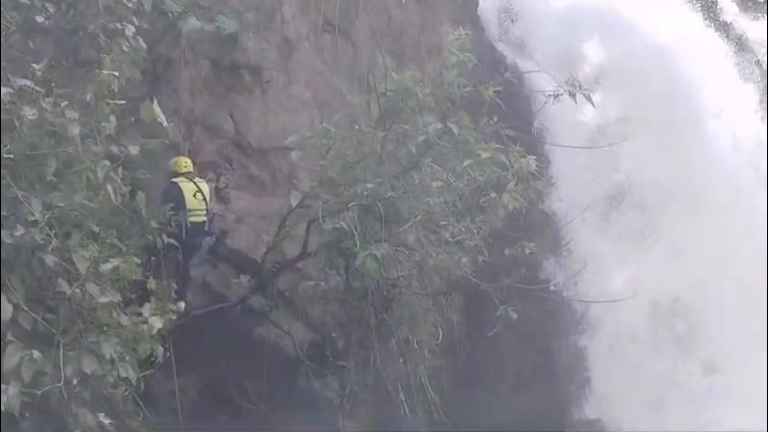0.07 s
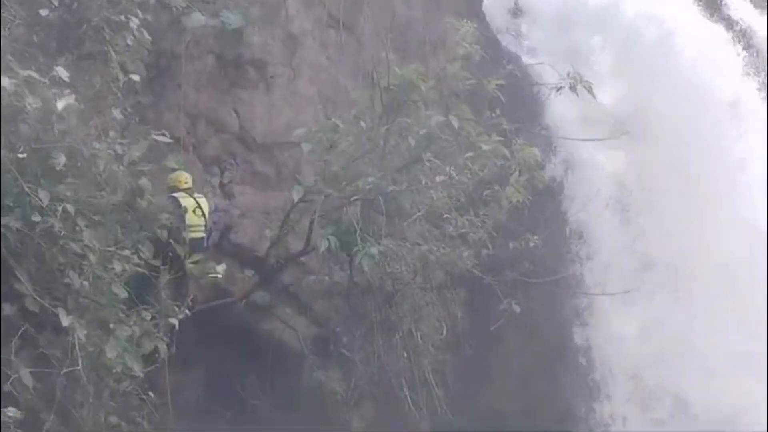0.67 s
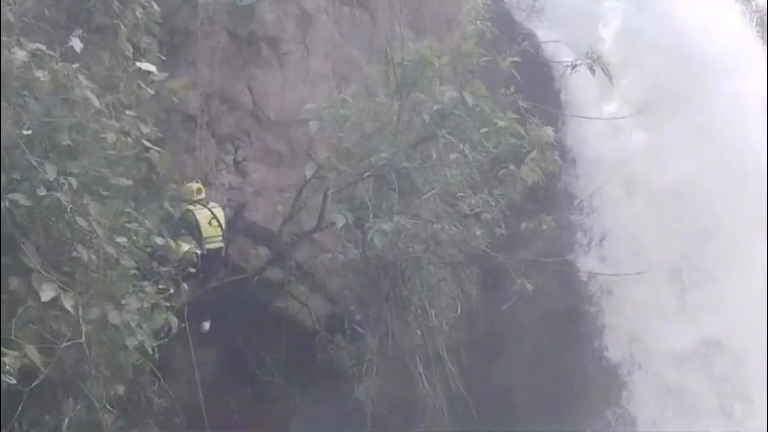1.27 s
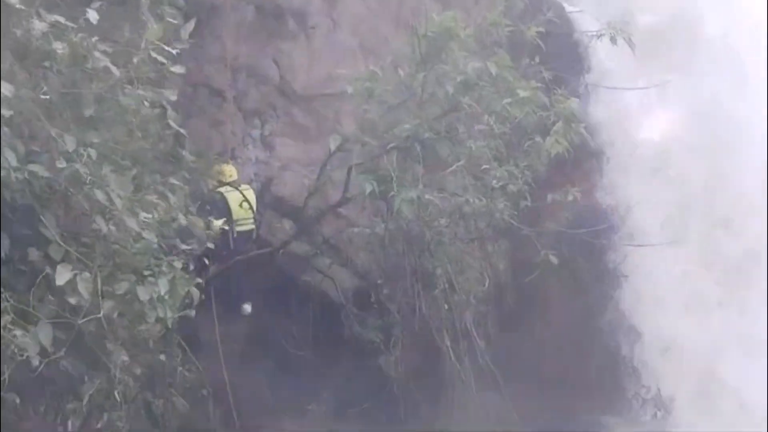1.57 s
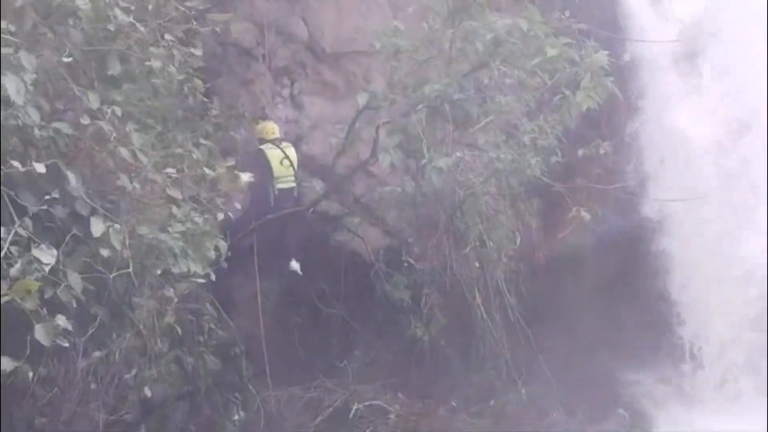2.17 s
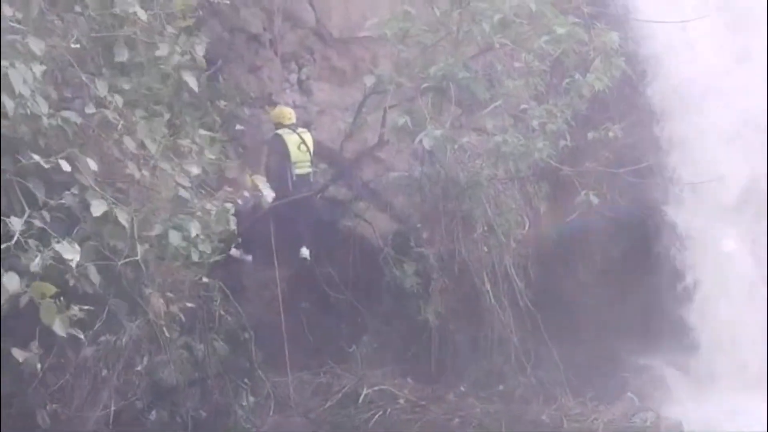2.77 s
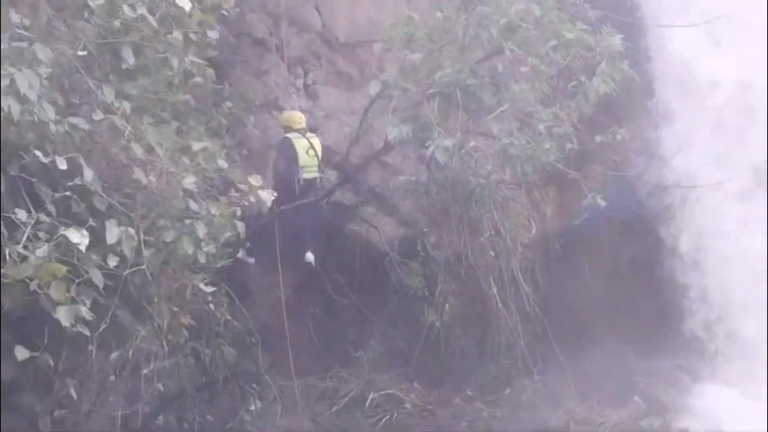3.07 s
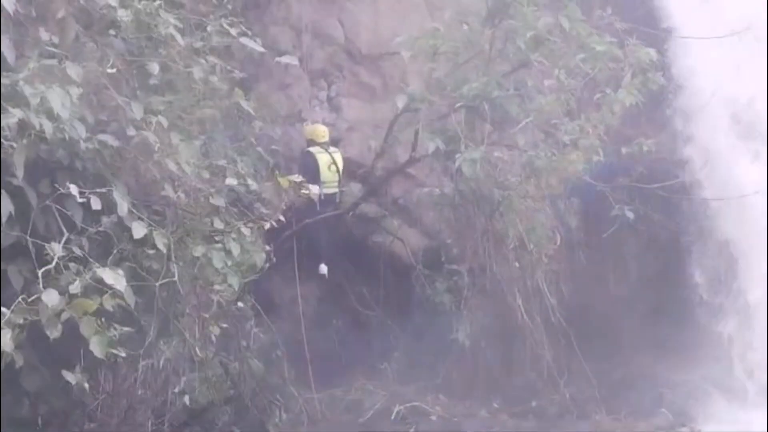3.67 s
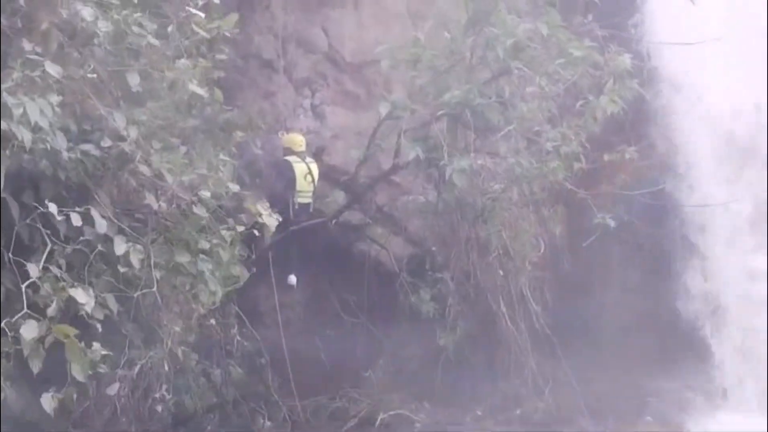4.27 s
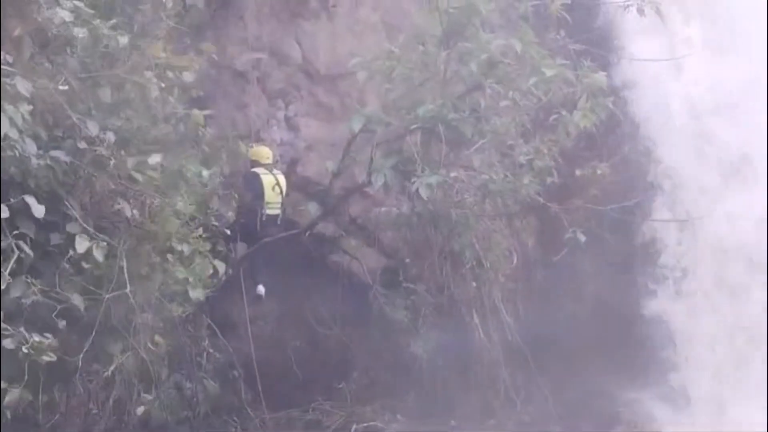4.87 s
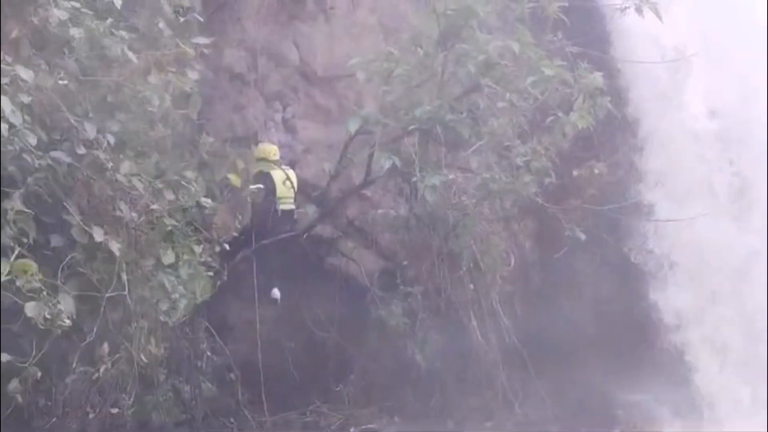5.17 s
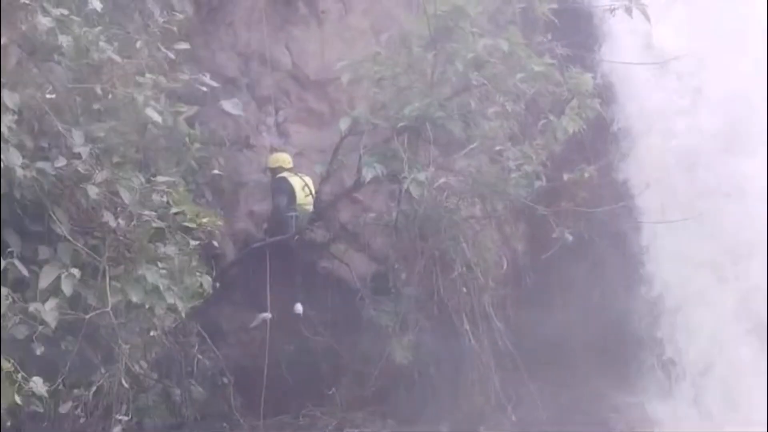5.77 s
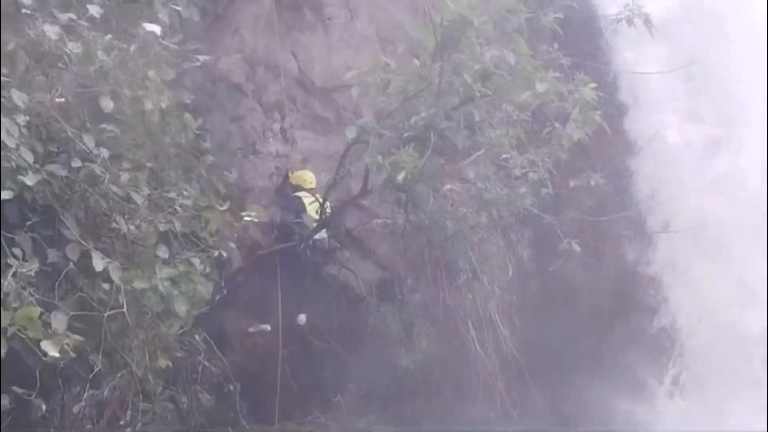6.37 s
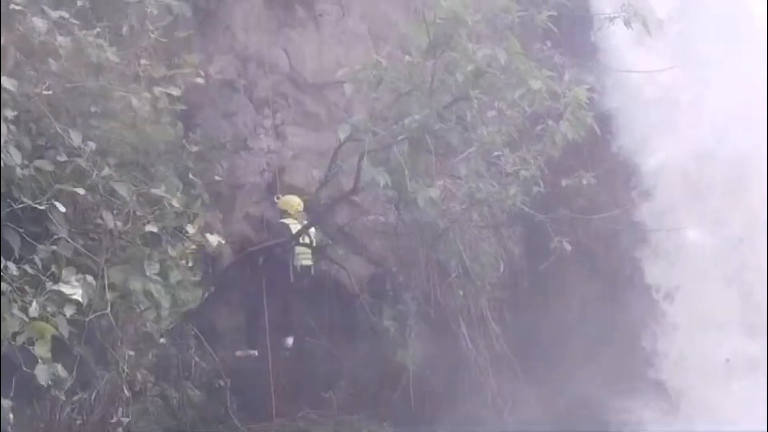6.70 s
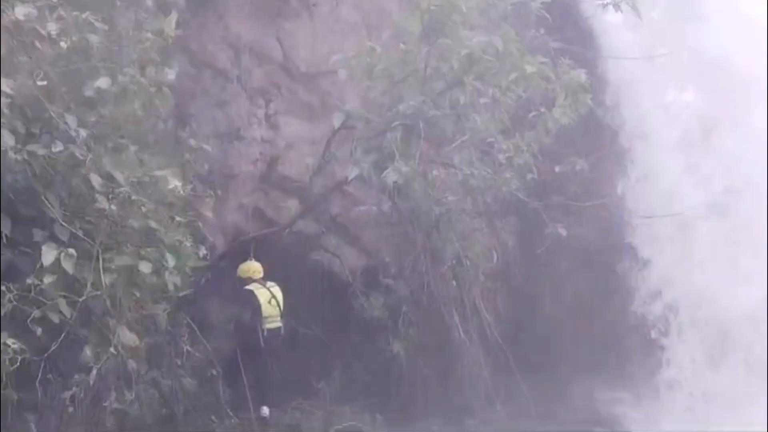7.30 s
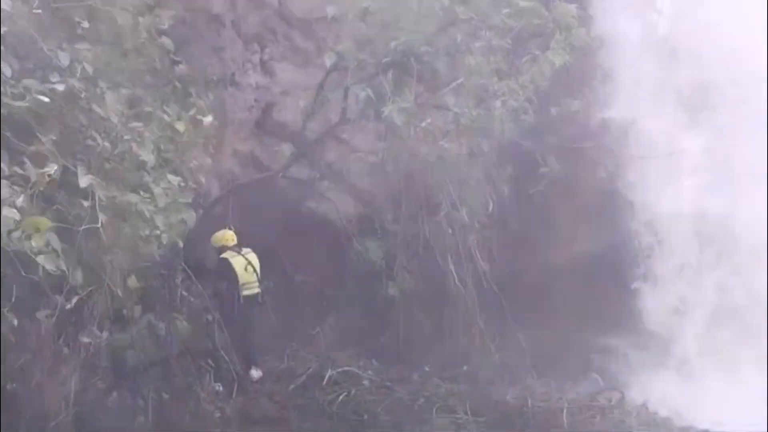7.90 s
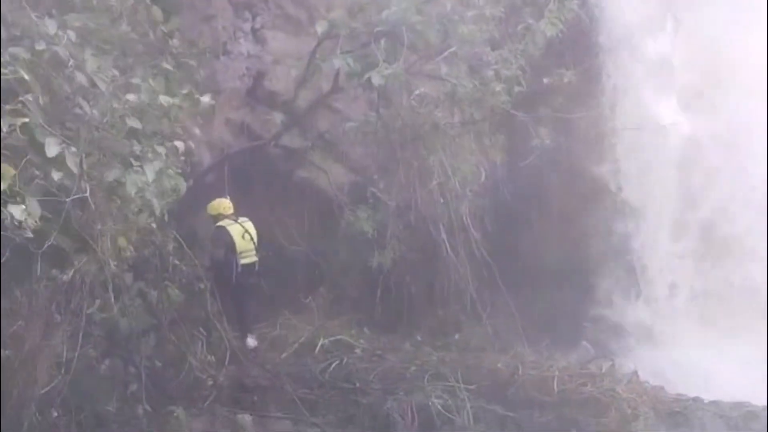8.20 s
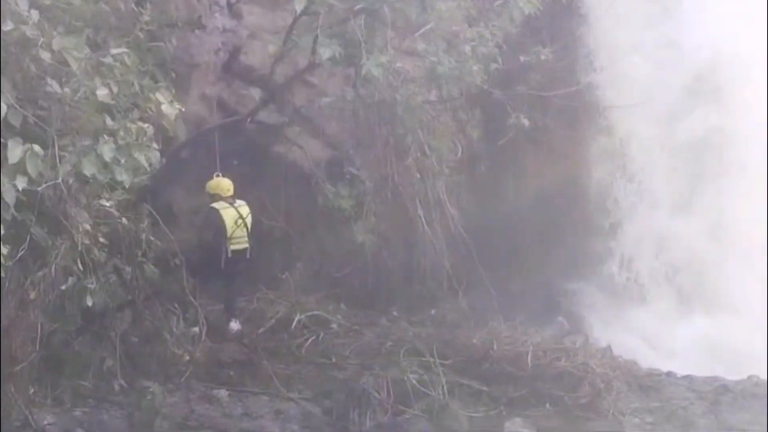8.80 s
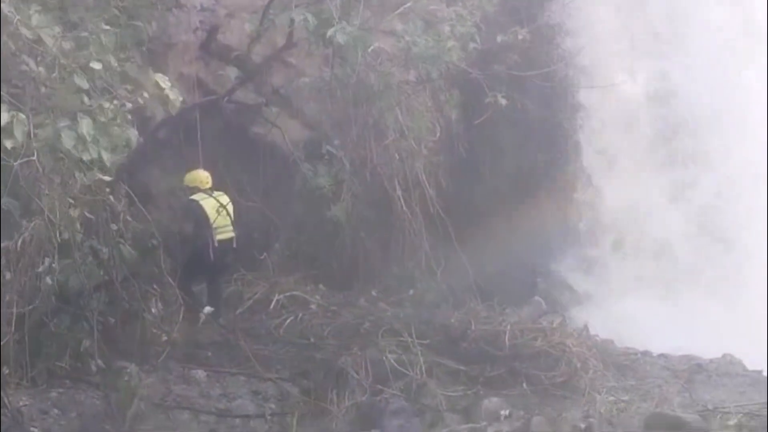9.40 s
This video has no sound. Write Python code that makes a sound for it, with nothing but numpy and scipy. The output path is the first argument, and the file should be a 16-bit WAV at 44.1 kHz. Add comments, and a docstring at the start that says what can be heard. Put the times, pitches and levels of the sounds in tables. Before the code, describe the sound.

A large waterfall rushes steadily beside a cliff, a bright hiss of spray over a thin roar. The rush flutters with a glassy, electronic warble and shifts in tone after about two seconds. Air from the fall rumbles and thumps against the hand-held microphone in irregular gusts. Short hollow gulps sound through it all, and two faint high peeps come near the end.

```python
"""Beside a cliff, within the draught of a large waterfall, on a hand-held microphone with two ports.
A bright hiss of spray lies over a thin roar and changes colour as the microphone tilts down. Both flutter
quickly, and narrow bands flicker on and off, giving the rush a glassy, electronic warble.
Air pushed out by the fall rumbles past the ports and its eddies buffet them.
Short hollow gulps and, near the end, two faint peeps sound through the rush."""
import sys
import numpy as np
from scipy import signal
from scipy.fft import rfft, irfft
from scipy.io import wavfile
from scipy.ndimage import uniform_filter1d

SR = 44100
rng = np.random.default_rng(int(sys.argv[2]) if len(sys.argv) > 2 else 0)


def dump(signal):
    """Clip the signal to [-1, 1] and save it as 16-bit WAV at the path in sys.argv[1]."""
    limited = np.clip(np.atleast_2d(signal).T, -1, 1)
    pcm = np.round(limited * 32767).astype(np.int16)
    wavfile.write(sys.argv[1], SR, pcm)


N = 425565
FRAME, HOP = 1024, 256
HZ = np.fft.rfftfreq(FRAME, 1 / SR)
TIME = np.arange(N) / SR
FRAME_TIME = np.arange(N // HOP + 2) * HOP / SR

# Levels in the tables are relative; each source adds its own trim.
# faint high peeps (time [s], pitch [Hz], left peak [dB], right peak [dB])
PEEP_NOTES = [(8.765, 3370, -47, -37), (8.84, 3160, -38, -58)]
# short hollow notes (time [s], pitch [Hz], left peak [dB], right peak [dB])
GULP_NOTES = [(0.362, 398, -51, -33), (0.592, 458, -32, -48), (0.707, 682, -31, -39),
              (1.058, 925, -36, -54), (1.988, 393, -30, -21), (2.058, 415, -45, -29),
              (2.089, 423, -51, -27), (2.14, 398, -55, -27.5), (2.442, 931, -38, -57),
              (2.663, 463, -29.5, -33), (2.834, 1012, -33, -57), (3.864, 425, -48, -34),
              (4.007, 940, -38, -54), (4.203, 436, -37, -30.5), (5.651, 415, -49, -29),
              (5.946, 447, -53, -32.5), (6.544, 602, -31, -48), (7.132, 412, -52, -32),
              (7.444, 964, -37, -49), (7.492, 420, -48, -28.5), (7.887, 885, -36, -51),
              (8.228, 410, -54, -30), (8.274, 408, -50, -28), (8.482, 947, -45, -37.5),
              (9.046, 937, -35, -62)]
# eddies hitting the ports (time [s], pitch [Hz], left peak [dB], right peak [dB])
EDDY_HITS = [(0.421, 458, -19, -35), (0.426, 96.6, -18, -38), (0.444, 420, -28, -27),
             (0.478, 141, -17, -31), (0.494, 357, -25, -48), (0.545, 125, -25, -32),
             (0.635, 98, -19.5, -29), (1.528, 388, -51, -25.5), (1.541, 137.3, -39, -21),
             (1.63, 136.3, -38, -25), (2.256, 132, -44, -15), (2.294, 145.5, -41, -22),
             (2.886, 111, -22, -39), (3.309, 142, -31, -44), (3.341, 285, -27, -51), (3.343, 168, -27, -42),
             (3.468, 102.8, -23, -41), (3.512, 138.4, -27, -27), (5.285, 96.7, -21, -38),
             (5.45, 165, -34, -33), (5.973, 151.4, -26, -26), (6.009, 268, -19, -40),
             (6.393, 431, -26, -51), (6.421, 134.7, -30, -19), (6.453, 367, -48, -20),
             (6.478, 129.5, -35, -15), (6.483, 136, -24, -26), (6.485, 355, -47, -23),
             (6.833, 105, -34, -15), (8.813, 113, -24, -30), (9.266, 138, -23, -26)]
# gusts at the microphone (peak time [s], half-length [s], left level [dB], right level [dB])
DRAUGHT_GUSTS = [(0.48, 0.069, -27, -34), (0.957, 0.15, -32, -41), (1.43, 0.1, -34.5, -30),
                 (1.6, 0.068, -42, -28.5), (2.205, 0.13, -44, -32.5), (2.58, 0.055, -48, -35),
                 (2.895, 0.074, -30.5, -33), (3.306, 0.061, -20.5, -40), (3.48, .11, -24.5, -40),
                 (3.73, 0.077, -36, -36), (5.38, 0.13, -35, -40), (6.018, 0.065, -40, -32),
                 (6.193, 0.035, -46, -30.5), (6.41, .025, -26.5, -39), (6.503, 0.061, -26, -24.5),
                 (6.864, .15, -36.5, -36), (7.416, .04, -52, -33), (7.75, 0.1, -34.5, -41),
                 (8.293, 0.12, -29.5, -52), (8.97, 0.12, -36, -49), (9.51, .06, -37, -39)]
# colour of the draught's rumble (frequency [Hz], level [dB])
RUMBLE_COLOUR = [(15, -36), (30, -15), (50, -1.5), (100, 3.5), (160, -2), (230, -8), (320, -22.5),
                 (500, -27), (900, -69)]
# slow swell of the rush (time [s], left level [dB], right level [dB])
RUSH_SWELL = [(0, 2, 4), (0.8, .5, 2.5), (1.3, 1, .5), (1.8, 0, -1.5), (2.25, 2.4, -1), (3.35, -2.5, -0.5),
              (3.55, -1, 1), (4.2, -0.9, 0), (4.9, 0, 0.5), (5.5, -0.1, -1.1), (6.3, -1, 0.5),
              (7.4, 0.3, 1.1), (7.8, -1.5, 1.5), (8.7, -1, 2.5), (9.6, -0.5, -0.5)]
# how far narrow bands flicker up and down (frequency [Hz], left depth [dB], right depth [dB])
FLICKER_DEPTH = [(300, 1, 2.5), (685, 8, 4.5), (990, 6, 4.5), (1366, 9, 17.5), (1760, 12, 2.5),
                 (2070, 16.5, 5.5), (2560, 15.5, 14), (2900, 26, 19.5), (3470, 36, 27), (3810, 5.5, 12.5),
                 (4660, 11, 14.5), (4890, 10, 24), (6070, 2, -1), (7250, 4.5, 5.5)]
# lower edge of the spray, microphone aimed up, then down
# (frequency [Hz], left density [dB], right density [dB])
FIZZ_MIC_UP = [(2340, -73, -77), (2520, -100, -99), (2630, -104, -64.5), (2790, -101.4, -93.5),
               (3720, -99, -86.5), (3710, -93, -80), (3660, -70, -68), (3970, -75, -77), (4370, -67, -63.5),
               (4640, -73.5, -65.5), (4900, -70, -68), (5200, -66.5, -77), (5700, -64.5, -76),
               (5480, -70, -69)]
FIZZ_MIC_DOWN = [(2528, -65.5, -101), (2557, -88, -119), (2705, -124, -77.5), (2920, -94, -92.5),
                 (3744, -89, -81.5), (3556, -61, -78.5), (3773, -75.5, -69.5), (4130, -65.5, -96),
                 (4010, -76, -85), (4524, -64.5, -82), (5150, -92.5, -75), (5145, -66, -70),
                 (5470, -66.5, -75), (5830, -80, -71)]
# fine spray, microphone aimed up, then down
# (frequency [Hz], left density [dB], right density [dB], left-right likeness [0-1])
HISS_MIC_UP = [(5614, -75, -62.5, 0), (5950, -73, -64.5, 0.0), (6080, -66, -60, 0.25),
               (7160, -62, -63, 0.015), (7170, -56.5, -65, 0.11), (7500, -54.5, -71, 0.45),
               (8200, -51, -62, 0.6), (8510, -54.5, -71, 1), (9900, -69, -56.5, 0.91),
               (10800, -59.5, -65.5, 0.8), (12800, -70, -61, 1), (13030, -69, -71, 0.64),
               (13200, -60.5, -79, 0.19), (14200, -62, -78, 0.04)]
HISS_MIC_DOWN = [(5640, -77.5, -65, 0.01), (5770, -65.5, -62, 0.0058), (6330, -69.5, -56.5, 0),
                 (6830, -65, -59, 0.66), (6820, -56.5, -59, 0.014), (7420, -54.5, -61.5, 0.85),
                 (8020, -51, -55.5, 0.62), (9240, -56.0, -56.5, 0.86), (9860, -60.5, -53.5, 1),
                 (10640, -63.5, -58, 0.89), (11740, -64.5, -63, 0.68), (12400, -63.5, -83, 0.057),
                 (13300, -60, -85, 0.14), (14220, -63.5, -69.5, 0.19)]
# body of the fall (frequency [Hz], left density [dB], right density [dB])
ROAR_COLOUR = [(151, -69, -69), (220, -74.5, -74), (316, -76, -76.5), (414, -76.5, -73.5),
               (633, -81.5, -82), (1010, -80, -82), (1130, -88.5, -85.5), (1315, -75, -72.5),
               (1523, -85, -71), (1734, -76, -58.5), (1700, -53, -65), (1840, -70, -64.5),
               (2251, -70.5, -67), (2354, -102, -80)]


def gain_of(db):
    """Decibels to gain."""
    return 10 ** (np.asarray(db) / 20)


def unit_rms(x):
    """Scales to rms 1."""
    return x / np.sqrt(np.mean(x ** 2) + 1e-20)


def columns(rows, at):
    """A table's value columns, interpolated along its first column."""
    key, *values = np.transpose(rows)
    return np.array([np.interp(at, key, v) for v in values])


def per_sample(ports):
    """Interpolates each port's curve from frames to samples."""
    return np.array([np.interp(TIME, FRAME_TIME, port) for port in ports])


def colour(rows, skirt_db_per_hz=0.55):
    """Left and right dB per bin, falling away beyond the ends of the table."""
    outside_hz = np.maximum(rows[0][0] - HZ, 0) + np.maximum(HZ - rows[-1][0], 0)
    return (columns(rows, HZ)[:2] - skirt_db_per_hz * outside_hz)[:, None]


def drift(ports, seconds, width_hz=0):
    """Smooth random field of rms 1 (ports, frames, bins); a single bin if no width is given."""
    frames, bins = len(FRAME_TIME), len(HZ) if width_hz else 1
    along_time = np.fft.fftfreq(frames)[:, None] * seconds * SR / HOP
    along_bins = np.fft.rfftfreq(bins) * width_hz * FRAME / SR
    blur = np.exp(-(2 * along_time) ** 2 - (2 * along_bins) ** 2)
    white = rng.standard_normal((ports, frames, bins))
    return unit_rms(np.fft.irfft2(np.fft.rfft2(white) * blur, (frames, bins)))


def noise(density_db, likeness=0):
    """Noise at both ports with the given density and left-right likeness per frame and bin."""
    white = rng.standard_normal((2, N)) * np.sqrt(SR / 2)
    left, other = signal.stft(white, nperseg=FRAME, noverlap=FRAME - HOP)[2].swapaxes(1, 2)
    same = np.clip(likeness, -1, 1)
    right = same * left + np.sqrt(1 - same ** 2) * other
    spectra = np.array([left, right]) * gain_of(density_db)
    return signal.istft(spectra.swapaxes(1, 2), nperseg=FRAME, noverlap=FRAME - HOP)[1][:, :N]


def mic_tilt(up, down, at_s, half_s):
    """Crossfades from the sound with the microphone aimed up to the sound with it aimed down."""
    share = (1 + np.tanh((FRAME_TIME[:, None] - at_s) / half_s)) / 2
    return (1 - share) * up + share * down


def bursts(rows, rise_s, decay_s, wander, rough, trim_db):
    """Short tones that swell and die away while their pitch and strength waver."""
    out = np.zeros((2, N))
    t = np.arange(-SR // 10, SR // 4) / SR
    envelope = np.exp(np.where(t < 0, -(t / rise_s) ** 2, -t / decay_s))
    for peak_s, hz, left_db, right_db in rows:
        bend, shake = unit_rms(uniform_filter1d(rng.standard_normal((2, len(t))), size=300))
        turns = rng.random() + np.cumsum(hz * (1 + wander * bend)) / SR
        wave = envelope * (1 + rough * shake) * np.sin(2 * np.pi * turns)
        gains = gain_of([[left_db + trim_db], [right_db + trim_db]])
        start = round((peak_s + t[0]) * SR)
        span = out[:, start:start + len(t)]
        span += gains * wave[:span.shape[1]]
    return out


def peeps():
    """Two faint, high, nearly steady notes, one to the right, then one to the left."""
    return bursts(PEEP_NOTES, rise_s=0.022, decay_s=0.036, wander=0.013, rough=0.3, trim_db=-1)


def gulps():
    """Short, hollow, wavering notes on either side of the microphone."""
    return bursts(GULP_NOTES, rise_s=0.016, decay_s=0.028, wander=0.0565, rough=0.36, trim_db=-3)


def buffets():
    """Eddies strike the ports directly, each a low thump of unsteady pitch."""
    return bursts(EDDY_HITS, rise_s=0.0084, decay_s=0.014, wander=0.167, rough=0.21, trim_db=-2.5)


def draught_strength(calm_db=(-44.5, -43.5), wander_db=2, lull_db=-0.5):
    """Light, wandering air with a slight lull midway and gusts on top (dB per port and sample)."""
    wander = drift(2, seconds=0.08)[..., 0]
    lull = np.exp(-((FRAME_TIME - 4.55) / 0.5) ** 2)
    power = gain_of(np.array(calm_db)[:, None] + wander_db * wander + lull_db * lull) ** 2
    for peak_s, half_s, left_db, right_db in DRAUGHT_GUSTS:
        bell = np.exp(-((FRAME_TIME - peak_s) / half_s) ** 2)
        power += gain_of([[left_db], [right_db]]) ** 2 * bell
    return per_sample(10 * np.log10(power))


def draught(trim_db=-3, lump_db=1.04, shared=0.68, lag_s=0.00018, split_hz=166, pivot_db=-37):
    """Air pushed out by the fall tumbles past the ports as a lumpy rumble, the left a little later."""
    hz = np.fft.rfftfreq(N, 1 / SR)
    shape = gain_of(columns(RUMBLE_COLOUR, hz)) * (hz < RUMBLE_COLOUR[-1][0])
    air = rfft(rng.standard_normal((3, N))) * shape
    both = air[2] * np.exp(-2j * np.pi * hz * np.array([[lag_s], [0]]))
    ports = np.sqrt(1 - shared) * air[:2] + np.sqrt(shared) * both
    lowpass = 1 / (1 + (hz / split_hz) ** 4)
    deep, bluster = irfft(ports * lowpass, N), irfft(ports * (1 - lowpass), N)
    strength_db = draught_strength()
    # a stronger draught breaks into smaller eddies, so its weight moves upward
    brightness = gain_of(0.3 * (strength_db - pivot_db))
    rumble = (deep / brightness + bluster * np.sqrt(brightness)) / np.std(deep + bluster)
    lumps = per_sample(drift(2, seconds=0.065)[..., 0])
    return rumble * gain_of(strength_db + trim_db + lump_db * lumps)


def warble(snap=5, rarity=0.05):
    """Narrow bands flicker on and off in a glassy, electronic warble (dB per port, frame and bin)."""
    depth_db = columns(FLICKER_DEPTH, HZ)[:, None]
    chance = drift(2, seconds=0.051, width_hz=57)
    # the deeper the gaps, the more seldom a band is on
    gate_db = depth_db * (np.tanh(snap * (chance - rarity * depth_db)) - 1)
    mean_db = 10 * np.log10(np.mean(gain_of(gate_db) ** 2, axis=1, keepdims=True))
    return gate_db - uniform_filter1d(mean_db, size=5, axis=2)


def surges(depth_db=0.85, shared=0.17):
    """The rush swells slowly and surges at random, partly at both ports alike (dB per port and frame)."""
    left, right, both = drift(3, seconds=0.064)
    quick = np.sqrt(1 - shared) * np.array([left, right]) + np.sqrt(shared) * both
    return columns(RUSH_SWELL, FRAME_TIME)[..., None] + depth_db * quick


def spray(surge_db, texture_db, fizz_trim_db=0.5):
    """Spray fizzes and, higher up, hisses; both change colour as the microphone tilts down."""
    # the surges show most in the heart of the hiss; the highest treble is steadier
    surge_share = np.interp(HZ, [5000, 7540, 10900, 12800], [0.67, 0.58, 1.0, 0.14])
    motion_db = surge_share * surge_db + texture_db
    fizz_db = mic_tilt(colour(FIZZ_MIC_UP), colour(FIZZ_MIC_DOWN), at_s=2.17, half_s=0.55)
    hiss_db = mic_tilt(colour(HISS_MIC_UP), colour(HISS_MIC_DOWN), at_s=2.5, half_s=0.11)
    likeness = mic_tilt(columns(HISS_MIC_UP, HZ)[2], columns(HISS_MIC_DOWN, HZ)[2], at_s=2.45, half_s=0.15)
    return noise(fizz_db + fizz_trim_db + motion_db) + noise(hiss_db + motion_db, likeness)


def roar(surge_db, flutter_db, warble_db, trim_db=-0.5):
    """The body of the fall, a thin roar whose low end is steadier than its upper part."""
    motion_db = np.interp(HZ, [900, 1700], [0.4, 1]) * (0.89 * surge_db + flutter_db)
    likeness = np.interp(HZ, [900, 1200], [0.4, -0.08])
    return noise(colour(ROAR_COLOUR) + trim_db + motion_db + warble_db, likeness)


def waterfall(overall_db=0.2, band_db=1.61):
    """The roar and hiss of falling water flutter quickly, a little overall and more band by band."""
    warble_db, surge_db = warble(), surges()
    flutter_db = overall_db * drift(1, seconds=0.013)
    flutter_db = flutter_db + band_db * drift(2, seconds=0.013, width_hz=1170)
    return roar(surge_db, flutter_db, warble_db) + spray(surge_db, flutter_db + warble_db)


def scene():
    """The fall, its draught and the short sounds as they meet at the microphone."""
    return buffets() + gulps() + peeps() + waterfall() + draught()


def record(dry, edge_hz=14350):
    """The recorder's band limit cuts off the highest treble."""
    lowpass = signal.firwin(1023, edge_hz, window=("kaiser", 9), fs=SR)
    return signal.oaconvolve(dry, lowpass[None], "same", axes=1)


dry = scene()
out = record(dry)
dump(out)
```